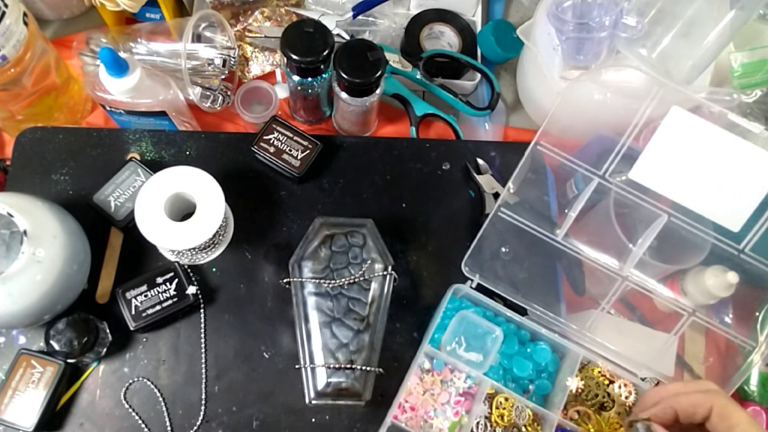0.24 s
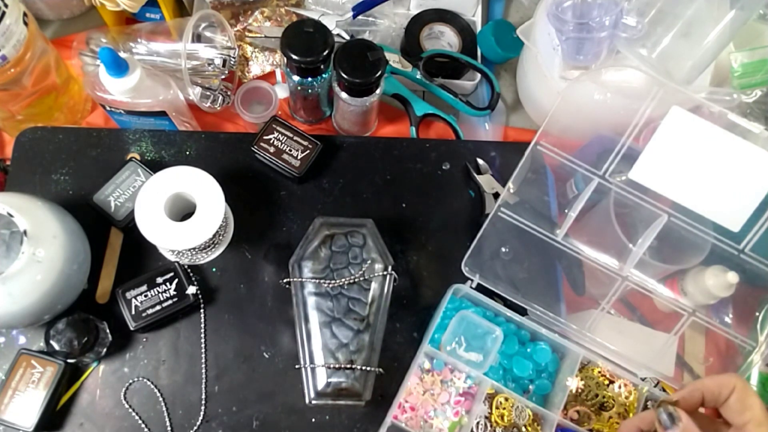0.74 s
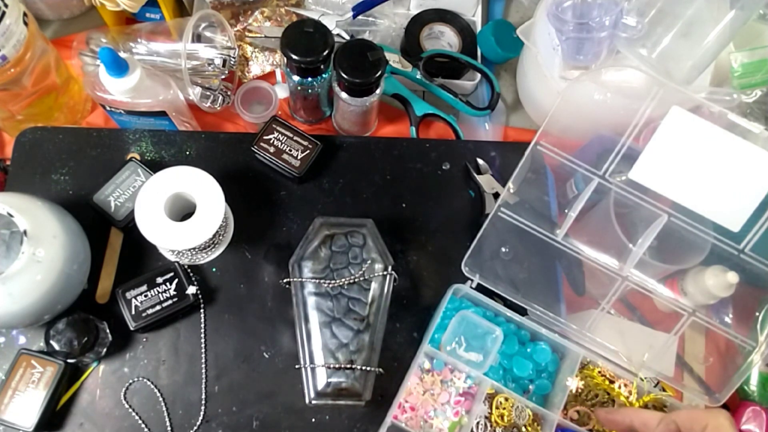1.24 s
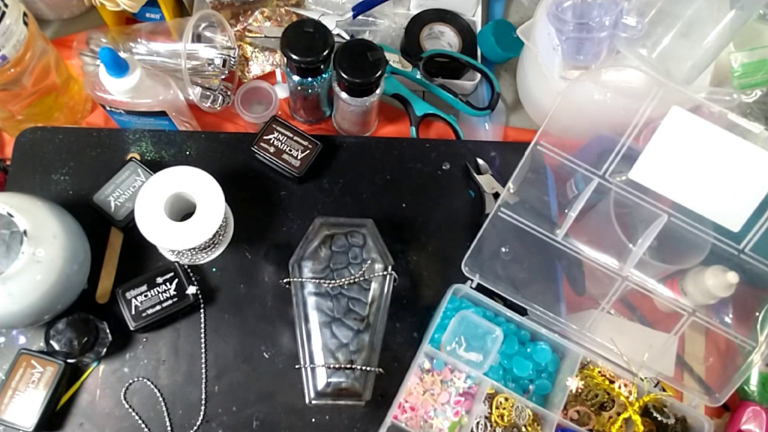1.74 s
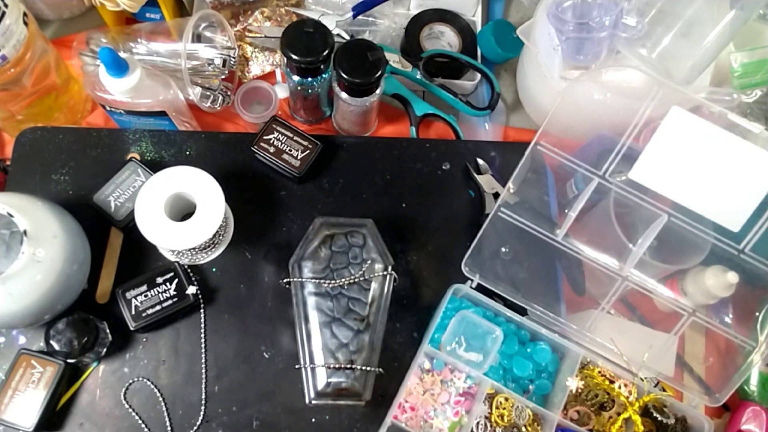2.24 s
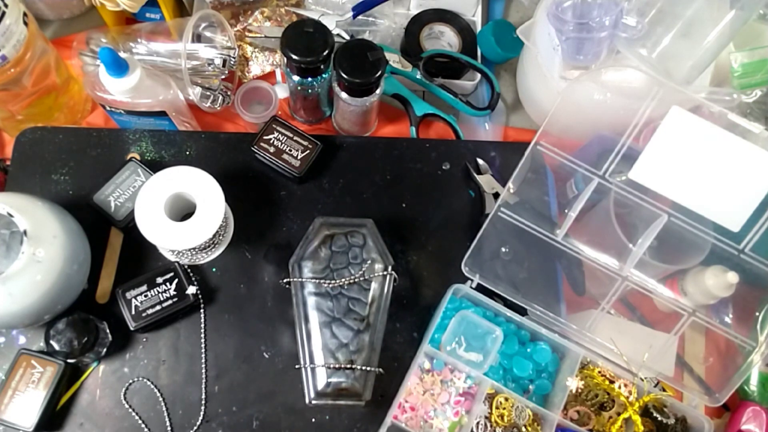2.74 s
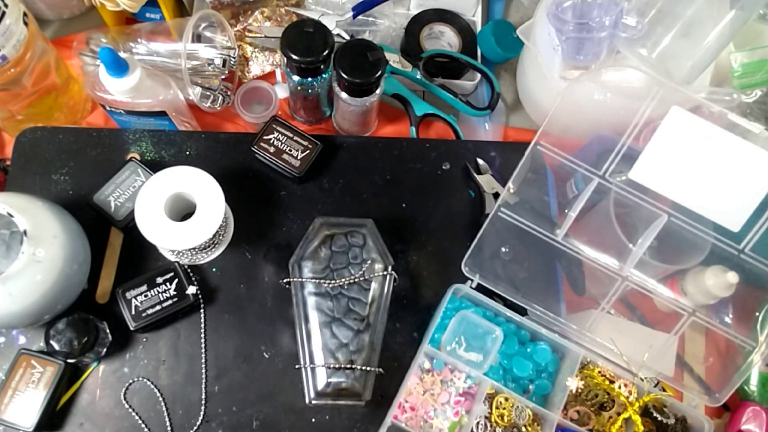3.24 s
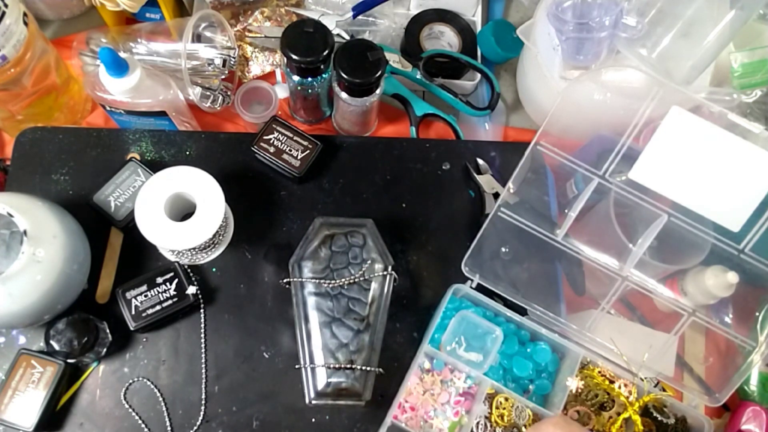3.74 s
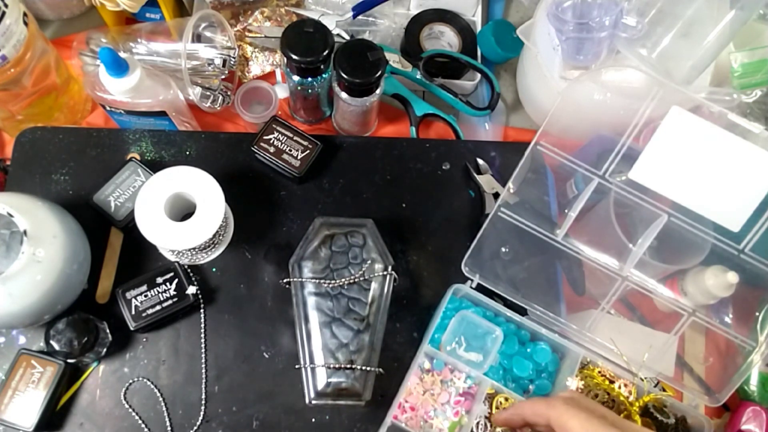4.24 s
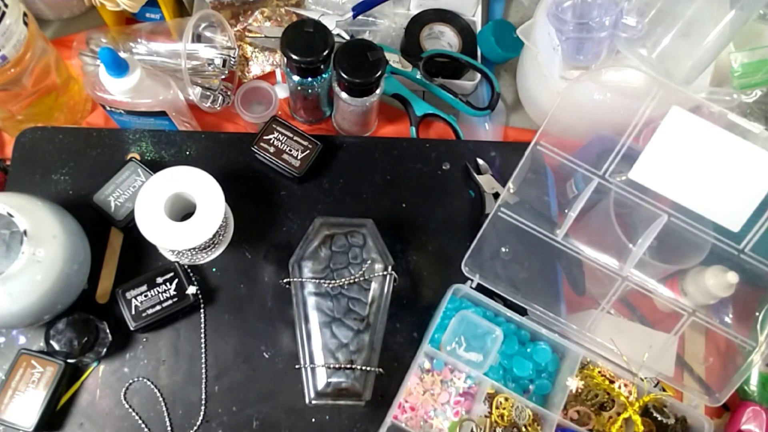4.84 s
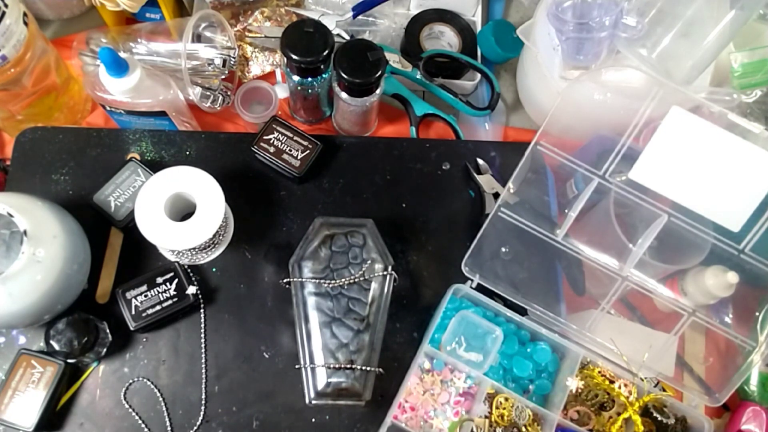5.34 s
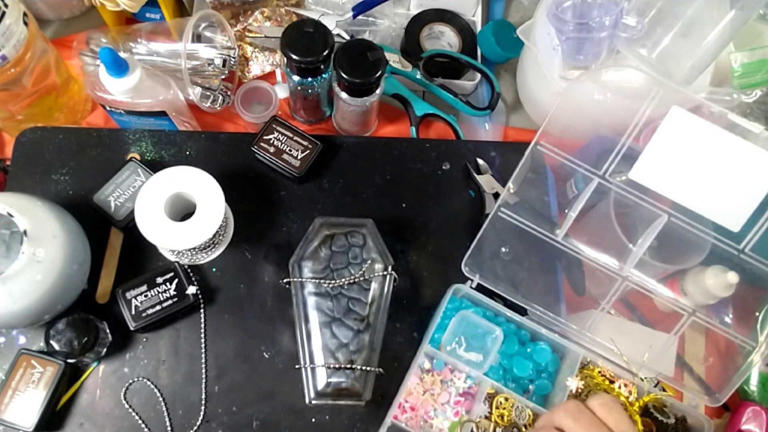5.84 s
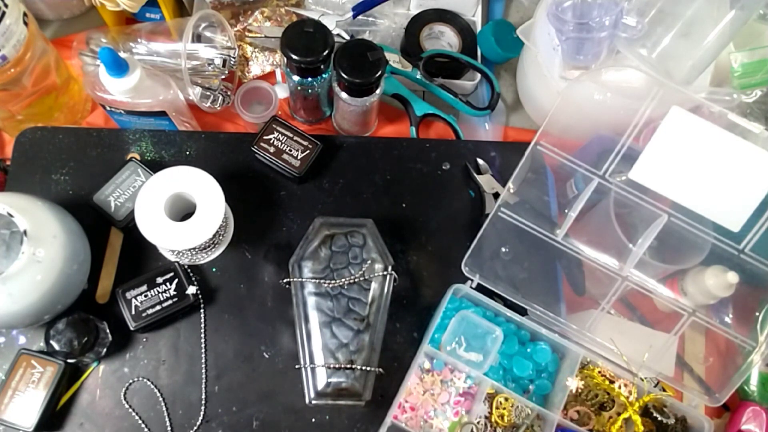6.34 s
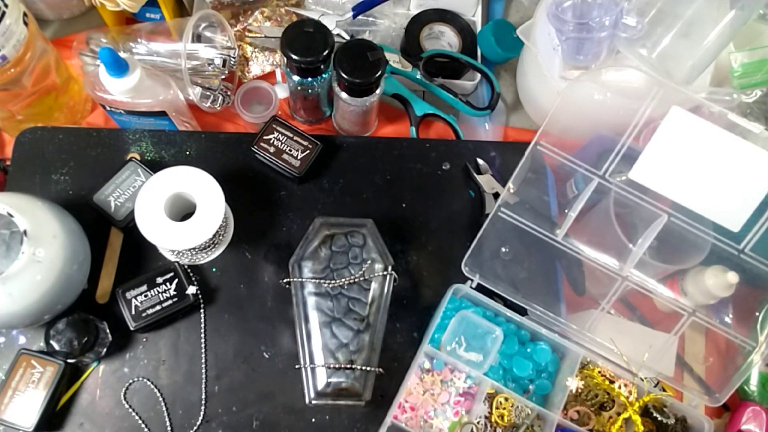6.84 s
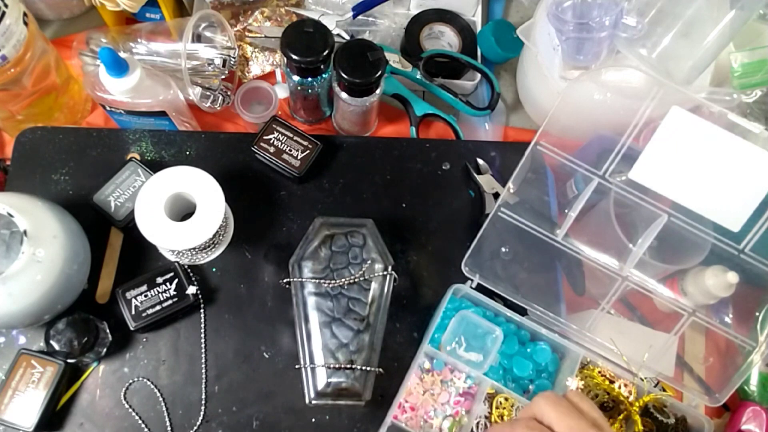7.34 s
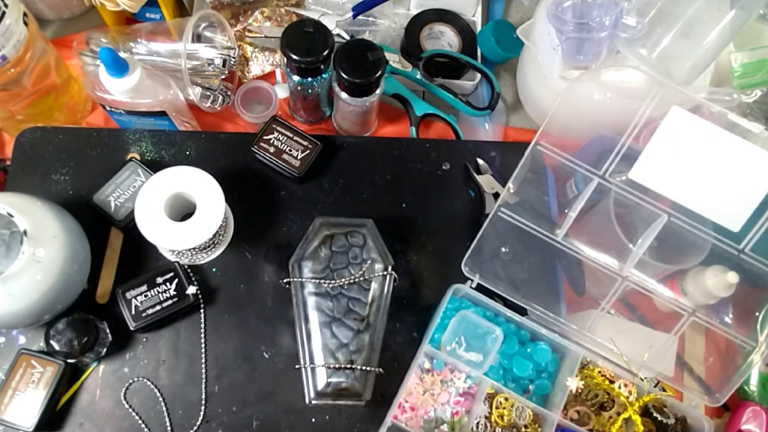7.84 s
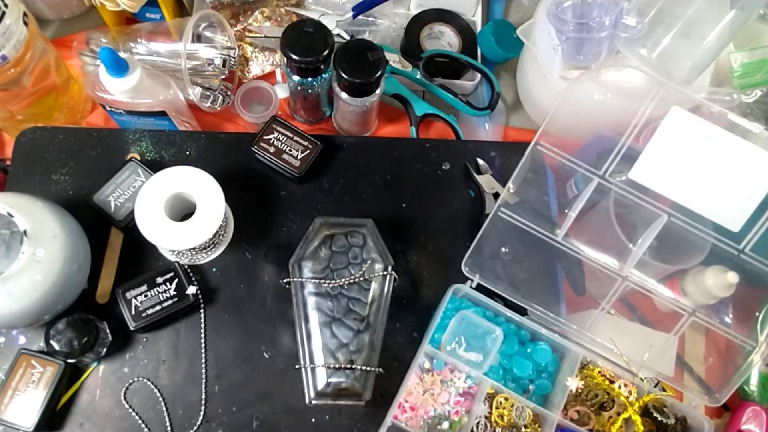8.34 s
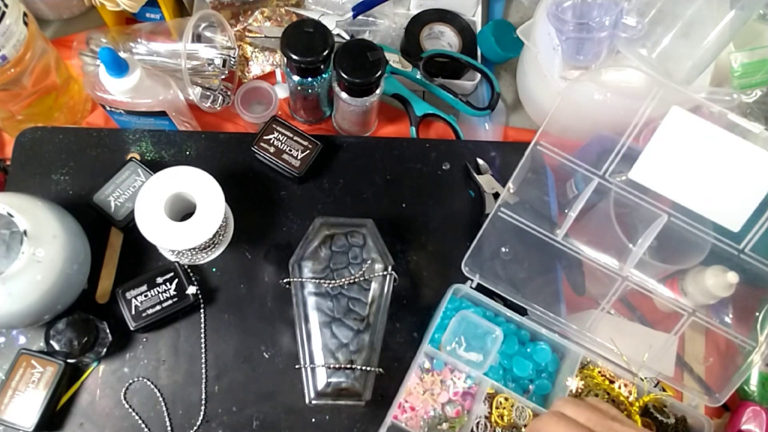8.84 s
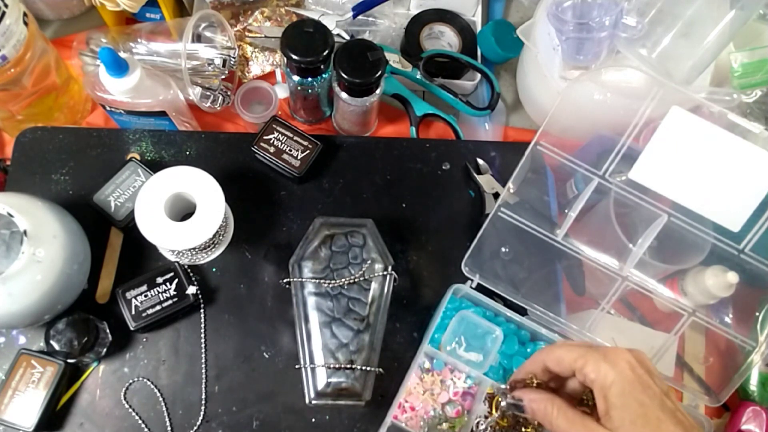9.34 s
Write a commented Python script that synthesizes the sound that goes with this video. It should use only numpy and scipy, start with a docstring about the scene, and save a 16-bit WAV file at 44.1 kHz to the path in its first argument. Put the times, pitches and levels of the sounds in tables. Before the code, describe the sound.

In a quiet room, a hand picks through light metal trinkets in a plastic tray close to the microphones, slightly left. Almost nothing for the first second and a half, then sharp clinks, grainy rattles and tiny high rings in irregular clusters, separated by short lulls. Dull bumps pass through the table, a faint low drone drifts by midway, and the rummaging peaks near the end.

```python
"""Tiny metal charms click and rattle in short bursts, as fingers rummage through a plastic tray close to two
microphone ports. Contacts are noise cracks, short sine rings and tray knocks over a bed of dense grains;
some pieces ring out as decaying sines, and close clutter scatters the sound. Soft low thuds come through
the table. Behind, shaped noise makes the room hum, a low passing drone and a faint, far, pulsing chirp."""
import sys
import numpy as np
from scipy import signal
from scipy.fft import rfft, irfft, next_fast_len
from scipy.io import wavfile
from scipy.ndimage import uniform_filter1d, map_coordinates

SR = 44100
rng = np.random.default_rng(int(sys.argv[2]) if len(sys.argv) > 2 else 0)


def master(y):
    """Save y as 16-bit WAV."""
    cut = np.clip(np.atleast_2d(y).T, -1, 1)
    pcm = np.round(cut * 32767)  # scale
    wavfile.write(sys.argv[1], SR, pcm.astype(np.int16))


N = 422919


def amp(db):
    """Decibels to amplitude."""
    return 10 ** (np.asarray(db) / 20)


def unit(x):
    """x at rms 1."""
    return x / np.sqrt(np.mean(x ** 2) + 1e-20)


def along(points, hz):
    """Values at hz from (Hz, value) points joined on a log frequency axis."""
    f, v = np.transpose(points)
    return np.interp(np.log(hz + 1), np.log(f + 1), v)


def wobble(rate):
    """A smooth random curve, rate knots a second."""
    knots = rng.standard_normal(int(N * rate / SR) + 4)
    return map_coordinates(knots, [np.arange(N) * rate / SR])


def filtered(x, response):
    """x times a complex response of frequency."""
    m = next_fast_len(N + SR // 2)
    return irfft(rfft(x, m) * response(np.fft.rfftfreq(m, 1 / SR)), m)[..., :N]


def narrow(centre_hz, width_hz, channels):
    """A fuzzy line of rms 1: noise under a narrow bell of frequency."""
    noise = rng.standard_normal((channels, N))
    return unit(filtered(noise, lambda hz: np.exp(-((hz - centre_hz) / width_hz) ** 2)))


def hum():
    """Room tone: near mono in the bass, unrelated in the treble, gently unsteady."""
    # colour of the room tone: (frequency [Hz], relative level per Hz [dB])
    hum_colour = [(15, -64.5), (25, -33), (66, -7), (114, -2), (153, -9), (175, -9), (405, -16.5),
                  (575, -20), (796, -20), (962, -23.5), (1190, -23.5), (6210, -37), (6920, -36.5),
                  (7510, -36), (16000, -39.5)]
    # likeness of the two ports: (frequency [Hz], left-right correlation [-1 to 1])
    likeness = [(60, .98), (240, .85), (640, .3), (1400, -.05), (15000, 0)]
    level_db = -68

    def mid_side(hz):
        turn = np.arccos(np.clip(along(likeness, hz), -1, 1)) / 2
        return amp(along(hum_colour, hz)) * np.array([np.cos(turn), np.sin(turn)])

    mid, side = filtered(rng.standard_normal((2, N)), mid_side)
    return amp(level_db + 1.3 * wobble(1.1)) * unit(np.array([mid + side, mid - side]))


def drone():
    """A low drone of two fuzzy lines swells for a while."""
    # the drone's passage, as rms of its lower line: (time [s], level [dB])
    passage = [(0, -96), (4.3, -84), (4.7, -71), (5.4, -78), (6.3, -76.5), (6.8, -82), (9.59, -99)]
    s, db = np.transpose(passage)
    level_db = np.interp(np.arange(N) / SR, s, db)
    lines = narrow(294, 42, channels=1) + amp(-6.0) * narrow(403.3, 6.2, channels=1)
    return amp(level_db) * lines


def chirp():
    """Far off, a thin steady tone and, just under it, a fuzzy one that pulses three times a second."""
    cycles = 3.05 * np.arange(N) / SR + .13
    pulse = np.clip(.4 + np.sin(2 * np.pi * cycles), 0, 1)
    steady = amp(-93) * narrow(7140, 5, channels=2)
    return steady + amp(-91) * pulse * narrow(6860, 45, channels=2)


def stir():
    """Stirring level in dB: every stroke rises, holds and falls alike, then leaves a faint settling."""
    # pushes of the fingers through the pile: (time at full strength [s], hold [s], stirring level [dB])
    strokes = [(1.765, 0.003, -50.5), (1.827, 0.0046, -63), (2.055, 0.06, -48), (2.168, 0.004, -39.5),
               (2.25, 0.12, -62), (2.444, 0.21, -60), (2.713, 0.046, -39), (2.783, 0.083, -48),
               (2.918, 0.035, -42), (3.065, 0.012, -41), (3.133, 0.096, -51), (3.217, 0.0045, -45.5),
               (3.319, 0.0039, -48.5), (3.414, .005, -48.5), (3.498, 0.0053, -49.5), (3.597, 0.0035, -50),
               (3.721, 0.012, -45.5), (4.061, 0.12, -52), (4.203, 0.0073, -39), (4.3, 0.043, -62.5),
               (4.695, 0.0091, -57.5), (4.834, 0.021, -64.5), (4.919, 0.07, -63.5), (5.035, 0.0041, -49),
               (5.195, 0.061, -62.5), (5.273, 0.083, -50.5), (5.703, 0.042, -48), (5.782, 0.11, -42.5),
               (6.095, 0.02, -62), (6.222, 0.069, -58), (6.344, .02, -63), (6.49, .31, -46.5),
               (6.92, 0.025, -51), (7.02, 0.18, -46), (7.251, .005, -43), (7.387, 0.023, -57.5),
               (7.559, 0.0028, -43), (7.694, 0.14, -46.5), (7.802, 0.056, -38), (7.892, 0.18, -44.5),
               (8.163, 0.0044, -32.5), (8.253, 0.29, -33.5), (8.615, 0.09, -51.5), (8.69, 0.092, -39),
               (8.84, 0.16, -48.5), (9.079, 0.0031, -46), (9.159, .09, -64), (9.281, 0.042, -38),
               (9.391, 0.015, -40.5)]
    rise_db_per_s, fall_db_per_s = 642, 341  # the pile starts moving fast and settles more slowly
    settle_db, settle_db_per_s = -27.5, 34  # last pieces keep sliding: level under the stroke, fading
    t, power = np.arange(0, N / SR, .002), 1e-12
    for s, hold, db in strokes:
        rise_db = db - rise_db_per_s * np.clip(s - t, 0, None)
        after = np.clip(t - s - abs(hold), 0, None)
        fall = amp(-2 * fall_db_per_s * after)  # doubled dB gives power
        settle = amp(2 * (settle_db - settle_db_per_s * after))
        power = power + amp(2 * rise_db) * (fall + settle)
    return np.interp(np.arange(N) / SR, t, 10 * np.log10(power))


def thuds(stir_db):
    """The hand's pressure reaches both ports through the table as low lumps, stronger when it stirs harder."""
    # resonances of the table: (centre [Hz], width [Hz], relative level [dB])
    table_modes = [(57, 10.7, -3.5), (81.2, 13.6, -1), (108.4, 22, 1.5), (143, 34, -4.5)]
    full_stir_db, growth_db_per_db, spread_s = -46.5, 0.4, 0.16  # level at 0 dB stirring, growth, smoothing

    def table(hz):
        return sum(amp(db) * np.exp(-((hz - c) / w) ** 2) for c, w, db in table_modes)

    low = filtered(rng.standard_normal(N), table)
    effort = uniform_filter1d(amp(2 * stir_db), int(spread_s * SR))
    effort_db = 10 * np.log10(np.abs(effort) + 1e-12)
    return amp(full_stir_db + growth_db_per_db * effort_db) * unit(low * amp(2.7 * wobble(14.0)))


def room(x):
    """Clutter near the tray scatters strongly in the first ms, then a short tail falls away after about 55 ms.
    The moving hand keeps changing both, differently for each port."""
    # decay of the tail: (frequency [Hz], time to fall 60 dB [s])
    tail_t60 = [(500, 0.25), (1500, 0.13), (5000, 0.1), (14000, 0.13)]
    out, step = np.zeros((2, N + SR)), SR // 16
    for i in range(0, N, step):  # fresh echoes for every sixteenth of a second
        hz, t, bands = signal.stft(rng.standard_normal((2, SR // 6)), SR, nperseg=128)
        fade_db = -60 * t / along(tail_t60, hz)[:, None] - 600 * np.clip(t - .052, 0, 1)
        early = amp(5 - 60 * t / 0.014)
        echoes = signal.istft(bands * (amp(fade_db) + early), SR, nperseg=128)[1]
        wet = signal.fftconvolve(x[None, i:i + step], echoes / np.linalg.norm(echoes[0]), axes=1)
        out[:, i:i + wet.shape[1]] += wet
    return out[:, :N]


def ports(x):
    """The tray lies nearer the left port: a little louder and earlier there."""
    lag_s = 12.5 / 44100  # right behind left
    side = np.array([[1], [-1]])  # each port takes half the lag and half the level difference
    return filtered(x, lambda hz: amp(side * 0.63) * np.exp(1j * np.pi * hz * lag_s * side))


def metal(x):
    """The colour that small charms radiate, at unit mean power."""
    # radiated colour: (frequency [Hz], relative level per Hz [dB])
    charm_colour = [(710, -24.5), (1200, -11.5), (1350, -6), (1770, -5.5), (2730, -2.5), (4130, -5),
                    (7330, -1.5), (13700, -14.5), (15300, -19.5), (16000, -36)]
    return filtered(x, lambda hz: unit(amp(along(charm_colour, hz))))


def tray(x):
    """The resonances of the plastic compartment, at unit mean power."""
    # resonances of the tray: (centre [Hz], width [Hz], relative level [dB])
    tray_modes = [(359, 750, -17.5), (520, 142, -9), (926, 306, -3.5), (1336, 280, 1), (2070, 910, -1.5),
                  (2700, 750, -7.5)]

    def response(hz):
        total = 0
        for k, (c, w, db) in enumerate(tray_modes):  # neighbours in opposite sign
            damping = 1j * hz * w
            total = total + (-1) ** k * amp(db) * damping / (c * c - hz * hz + damping)
        return total / np.sqrt(np.mean(np.abs(total) ** 2))

    return filtered(x, response)


def spikes(share, spread_db):
    """Sparse random grains on a share of the samples, a few of them much stronger."""
    return (rng.random(N) < share) * rng.standard_normal(N) * amp(spread_db * rng.exponential(size=N))


def chinks():
    """Brief decaying sines at random moments, each at its own pitch, together at rms 1."""
    draw = rng.random((8000, 3))
    t = np.arange(256) / SR
    hz = 1800 * np.exp(1.715 * draw[:, 1:2])
    level_db = -2.5 * np.log(draw[:, 2:] + .03)
    rings = amp(level_db - 60 * t * hz / 14) * np.sin(2 * np.pi * hz * t)  # 60 dB down in 14 cycles
    at = (draw[:, :1] * N).astype(int) + np.arange(256)
    return unit(np.bincount(at.ravel(), rings.ravel())[:N])


def rattle(stir_db):
    """Countless small collisions: dense grains, clumped in time, part of them ringing briefly at their own pitch."""
    clumps = amp(3.15 * wobble(45) + 1.46 * wobble(200))
    chink = np.zeros(N)
    found = chinks()
    chink[:len(found)] = found  # silence after the last chink
    grains = unit(spikes(.15, 2.54)) + amp(-8.5) * chink
    bright = unit(metal(grains) * clumps)
    soft = filtered(bright, lambda hz: 1 / (1 + (hz / 7000) ** 4))
    hard = np.clip((stir_db + 68.5) / 25, 0, 1)  # gentle stirring is duller
    bright = soft + hard * (bright - soft)
    dull = unit(tray(spikes(.05, 2.8)) * clumps)
    return amp(stir_db - 4) * (bright + amp(-13.5) * dull)


def pings():
    """Charms that ring freely and hollow tray bumps: each tone swells and dies, wavering as the piece turns."""
    # single clear tones: (start [s], pitch [Hz], level before swell and waver [dB], rise constant [s],
    # time to fall 60 dB [s])
    free_tones = [(3.219, 13850, -35, .001, .06), (3.417, 13450, -40, .003, .09),
                  (3.615, 13450, -50, .006, .07), (3.731, 14100, -48, .003, .09),
                  (4.204, 1858, -33, .004, .08), (5.677, 540, -36, .001, .03),
                  (5.716, 850, -38, .002, .035), (7.06, 5600, -38, .004, .08), (7.27, 3050, -53, .004, .3),
                  (7.384, 7590, -42, .003, .08), (8.434, 10940, -27, .005, .06),
                  (8.675, 10940, -18, .025, .15), (8.70, 6350, -27, .008, .08),
                  (9.06, 13600, -48, .005, .12), (9.405, 13900, -38, .003, .15)]
    out = np.zeros(N + SR)
    t = np.arange(SR // 4) / SR
    for s, hz, db, rise, t60 in free_tones:
        swell = (1 - np.exp(-t / rise)) ** 2
        out[round(s * SR):][:len(t)] += amp(db - 60 * t / t60) * swell * np.sin(2 * np.pi * hz * t)
    return out[:N] * amp(2.5 * wobble(120))


def small_contacts(stir_db):
    """Random lesser contacts, in the columns of the clear ones, as strong as the stirring at their moment."""
    count, over_stir_db, spread_db = 900, 5, 2
    ring_hz, ring_octaves, knock_db = 3264, 0.608, -21.5  # usual ring, its scatter, usual tray knock
    s = rng.uniform(0, N / SR - .01, count)
    draw = rng.standard_normal((count, 3))
    db = stir_db[(s * SR).astype(int)] + over_stir_db + spread_db * draw[:, 0]
    hz = np.clip(ring_hz * 2 ** (ring_octaves * draw[:, 1]), 1000, 12000)
    return list(zip(s, db, hz, knock_db + spread_db * draw[:, 2]))


def clicks(stir_db):
    """Each contact: a crack of a few ms, a short rough ring of two near modes of the piece, and a tray knock."""
    # clear contacts: (time [s], level before the layer trims below [dB], ring [Hz],
    # tray knock relative to that level, before its trim [dB])
    contacts = [(0.499, -62, 1150, -20), (0.918, -67, 1190, -12), (1.7378, -36, 2440, -11),
                (1.7513, -28.5, 2850, -10.5), (1.8082, -27.5, 2220, -15), (2.0565, -34, 3350, -25),
                (2.0918, -28.5, 3270, -25), (2.1657, -28, 2800, -22), (2.1843, -21.5, 7730, -22),
                (2.4016, -41, 3390, -26), (2.4396, -40.5, 3260, -19), (2.475, -35, 3240, -22),
                (2.527, -34.5, 3300, -18), (2.7008, -13.5, 2550, -33.5), (2.7552, -26.5, 6500, -32),
                (2.8, -23, 3140, -20.5), (2.8161, -26.5, 2560, -13.5), (2.8853, -33, 2640, -11),
                (2.9005, -46.5, 1730, 7.5), (2.926, -20.5, 2260, -14), (3.018, -34.5, 2160, -20),
                (3.0669, -34, 2750, -8.5), (3.1021, -29.5, 2780, -17), (3.1556, -28.5, 2770, -35),
                (3.2183, -28, 8330, -13), (3.2977, -35, 2700, -9), (3.3892, -33, 3800, -18),
                (3.4166, -32, 6400, -22), (3.485, -30, 2570, -13.5), (3.5949, -33, 5640, -37),
                (3.697, -30, 1310, -7.5), (3.729, -23.5, 3590, -19), (4.047, -33, 4870, -26),
                (4.067, -25.5, 4950, -31), (4.167, -31, 4640, -19), (4.1794, -30.5, 2100, -16),
                (4.2034, -25, 1940, -10), (4.219, -21, 1830, -19), (4.2948, -44.5, 2500, -3),
                (4.676, -43, 2680, -14), (4.829, -56, 2000, -13), (4.9102, -39.5, 2460, -5),
                (4.9896, -58, 3920, -21), (5.014, -33.5, 2840, -19), (5.244, -40.5, 3850, -16),
                (5.2706, -33, 7400, -17), (5.3152, -27.5, 2980, -21), (5.3336, -28, 2780, -40),
                (5.6752, -26, 1870, -7), (5.7147, -24.5, 1100, -8), (5.779, -25, 4070, -9.5),
                (5.8214, -20.5, 4640, -6), (5.883, -16.5, 8400, -17), (6.0855, -46.5, 1860, -11),
                (6.218, -44, 2890, -18), (6.238, -38.5, 1980, -18), (6.3576, -32, 6130, -32),
                (6.461, -35, 2800, -17), (6.4718, -29.5, 5530, -25), (6.5168, -36, 2660, -11),
                (6.621, -31, 2900, -26), (6.6485, -25.5, 2720, -21), (6.7368, -24, 2900, -26),
                (6.762, -23.5, 2670, -23), (6.778, -22.5, 2800, -20), (6.79, -19, 2720, -39),
                (6.9303, -38, 1310, -4), (7.0385, -28, 1370, -24), (7.1564, -30, 2500, -10.5),
                (7.1833, -31.5, 2330, -8), (7.2403, -25.5, 2760, -4.5), (7.3842, -34.5, 1390, -25),
                (7.4301, -36.5, 1810, -21), (7.5391, -28, 3040, -36), (7.6457, -32.5, 2730, -15.5),
                (7.7084, -33, 2050, -16), (7.7892, -14, 8660, -31), (7.819, -20, 2820, -31),
                (7.8905, -28, 7320, -37), (7.9455, -18, 2030, -18.5), (8.1367, -30, 2660, -12),
                (8.223, -27.5, 2840, -7), (8.2707, -14, 2830, -15), (8.324, -17.5, 2800, -29),
                (8.3723, -31, 2880, -24), (8.3898, -13.5, 4640, -38), (8.44, -18.5, 2900, -21),
                (8.4547, -16.5, 1230, -15), (8.473, -26.5, 1314, -23), (8.499, -18.5, 4600, -38),
                (8.5242, -21.5, 4660, -27), (8.543, -15.5, 2860, -16), (8.6023, -32.5, 2290, -5.5),
                (8.6725, -19.5, 6360, -15), (8.689, -15.5, 6000, -22.5), (8.7692, -15, 7640, -26.5),
                (8.8443, -23.5, 1470, -9.5), (8.9044, -30.5, 2200, -9.5), (8.996, -28.5, 4950, -12.5),
                (9.0516, -33.5, 1590, -28), (9.0822, -27.5, 7340, -19), (9.238, -33.5, 2580, -16),
                (9.254, -26.5, 2100, -19), (9.2795, -20, 6600, -16), (9.2938, -23, 6300, -26),
                (9.3248, -24, 4450, -33), (9.3615, -22, 7400, -22.5), (9.3777, -17.5, 7050, -22),
                (9.4032, -11.5, 6200, -29)]
    crack, ring, knock = np.zeros((3, N + SR))
    t = np.arange(SR // 20) / SR
    rise = 1 - np.exp(-t / 0.00063)
    for s, db, hz, knock_db in list(contacts) + small_contacts(stir_db):
        noise = rng.standard_normal((2, len(t)))
        i = round(s * SR)
        second_hz = hz * rng.uniform(.8, 1.3)
        pair = np.sin(2 * np.pi * hz * t) + .4 * np.sin(2 * np.pi * second_hz * t)
        crack[i:i + len(t)] += amp(db - 9 - 60 * t / .018) * rise * noise[0]
        ring[i:i + len(t)] += amp(db - 4 - 60 * t / (.005 + 12 / hz)) * rise * pair  # low rings last longer
        knock[i:i + len(t)] += amp(db + knock_db + 0.5 - 60 * t / 0.016) * rise * noise[1]
    return metal(crack[:N]) + ring[:N] + tray(knock[:N])


def scene():
    """The charms, direct and scattered, at the two ports, over table and room."""
    stir_db = stir()
    charms, tones = rattle(stir_db) + clicks(stir_db), pings()
    scattered = room(charms + amp(-10) * tones)  # free ringing, clear of the pile, excites the clutter less
    wet = filtered(scattered, lambda hz: hz ** 2 / (hz ** 2 + 300 ** 2))  # little bass
    near = ports(charms + tones + amp(6.5) * wet)
    return near + hum() + thuds(stir_db) + chirp() + drone()


def record(dry):
    """The recorder keeps nothing above its band limit."""
    top_hz = 15900
    return filtered(dry, lambda hz: hz < top_hz)


dry = scene()
out = record(dry)
master(out)
```